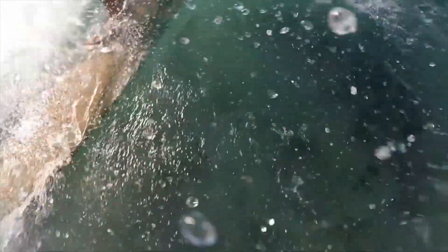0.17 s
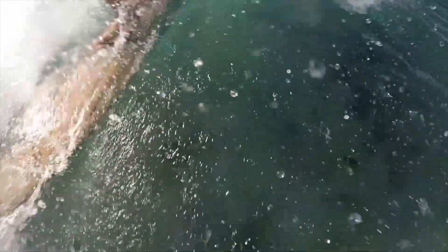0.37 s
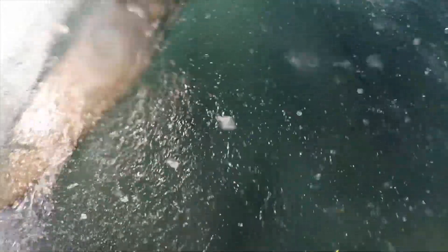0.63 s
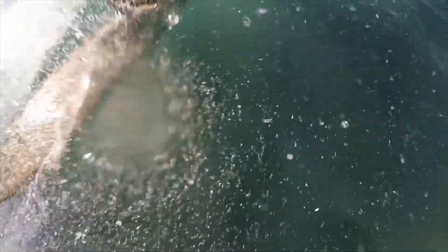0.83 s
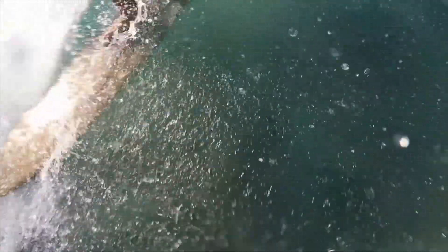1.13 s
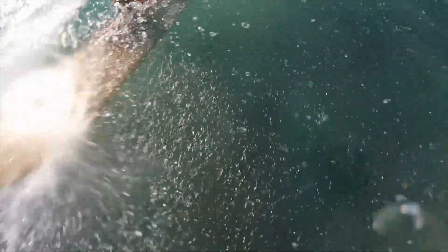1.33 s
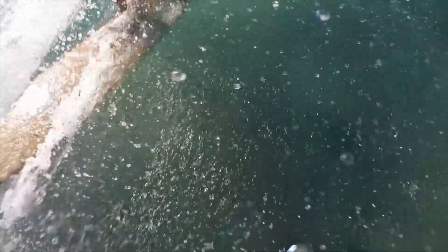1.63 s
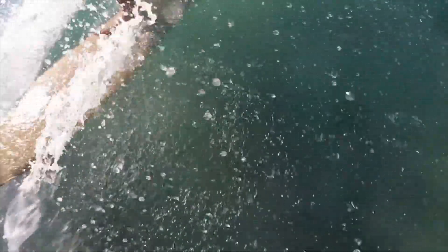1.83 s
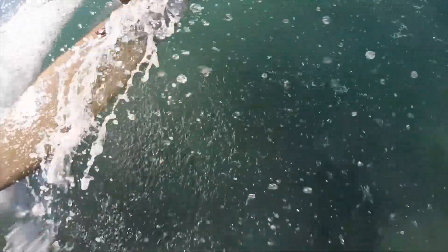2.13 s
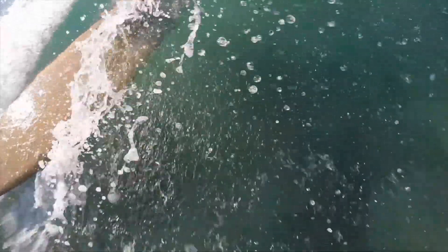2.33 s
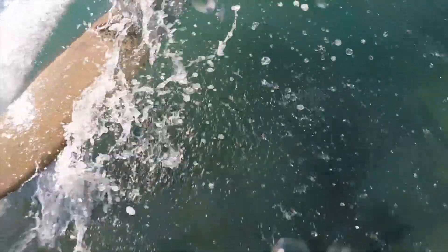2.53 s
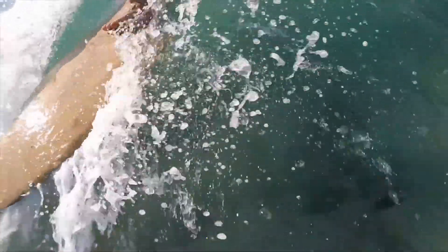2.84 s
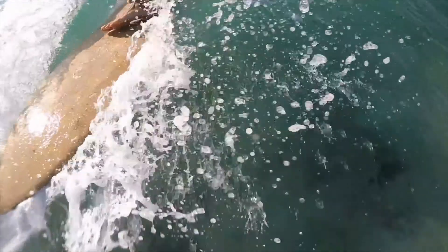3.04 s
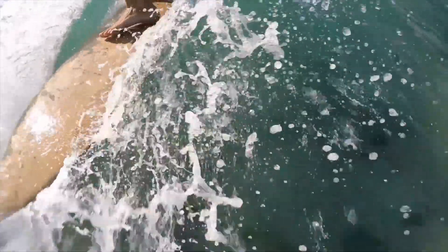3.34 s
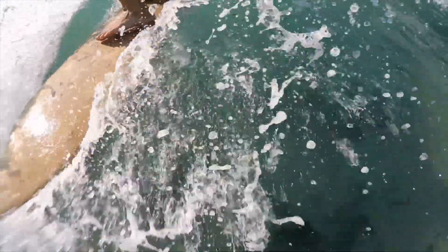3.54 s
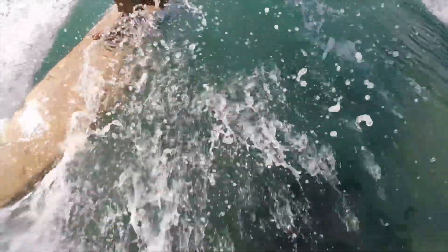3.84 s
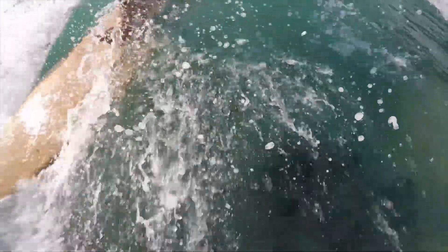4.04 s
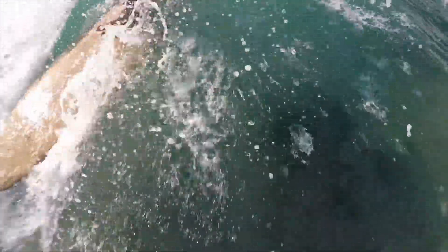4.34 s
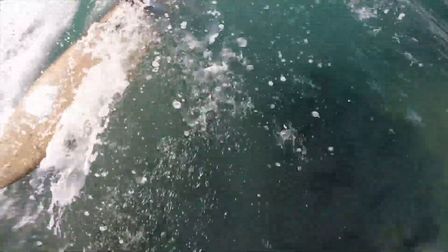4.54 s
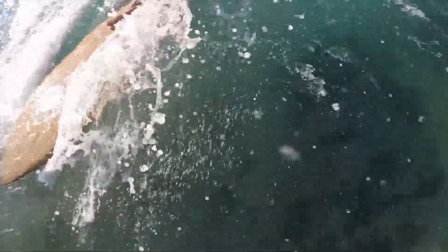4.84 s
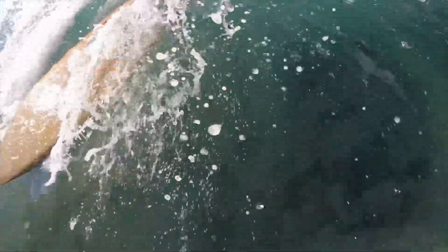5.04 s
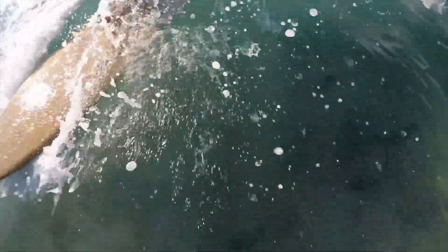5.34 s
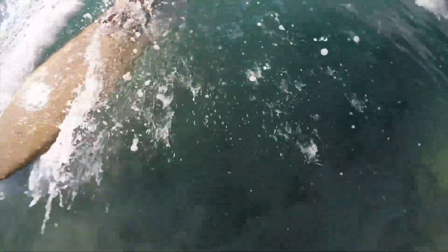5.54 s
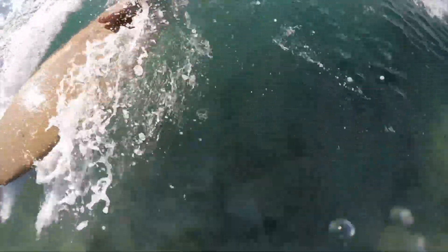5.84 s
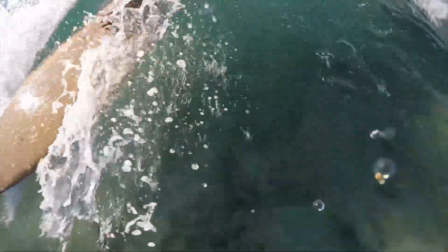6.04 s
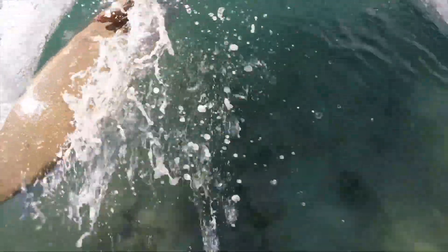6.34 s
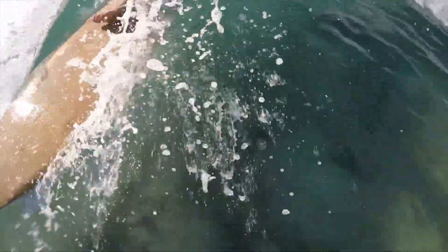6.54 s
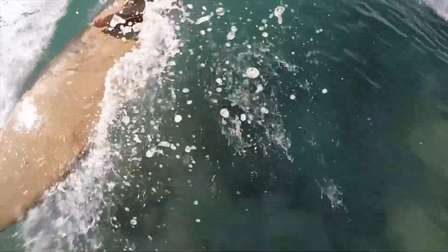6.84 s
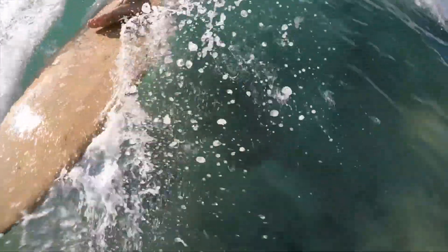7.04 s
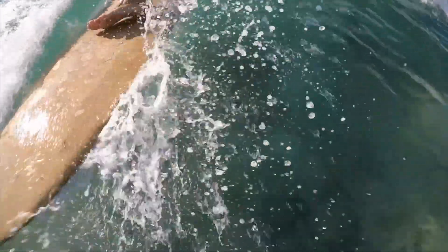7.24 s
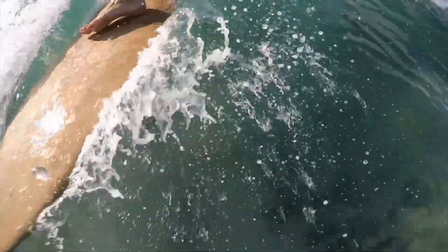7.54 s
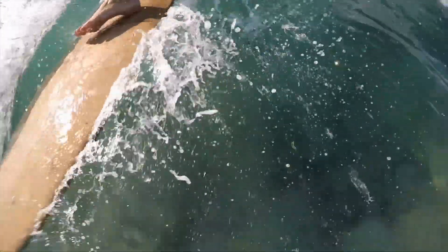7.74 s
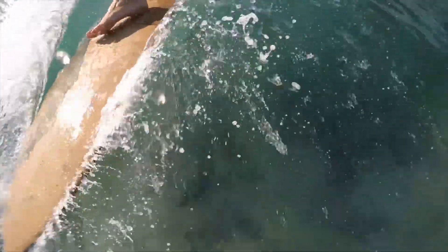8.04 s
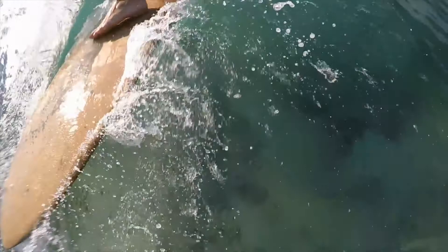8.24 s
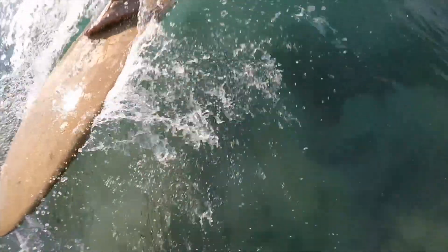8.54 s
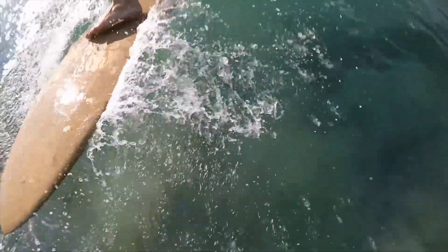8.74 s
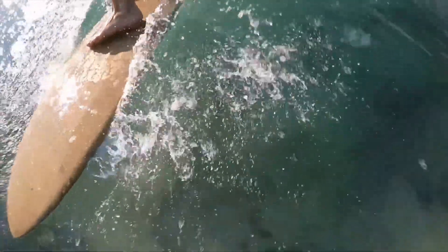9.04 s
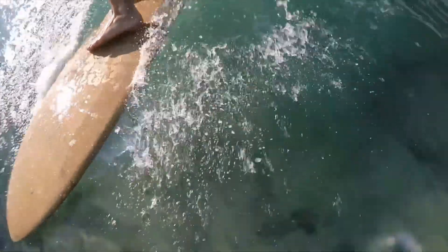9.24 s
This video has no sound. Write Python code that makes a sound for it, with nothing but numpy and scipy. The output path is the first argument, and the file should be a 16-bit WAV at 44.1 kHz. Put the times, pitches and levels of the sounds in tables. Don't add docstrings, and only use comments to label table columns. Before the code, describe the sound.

Outdoors on a wave, close to the board, the microphone is shut in a case that dulls everything. Low rumbling gusts push and thud irregularly. Rushing water, foam and spray start quietly and swell after three seconds. Trapped air glugs against the case, occasional drops tick on it, and a big wobbling surge arrives late, followed by booming wind hits.

```python
import sys
import numpy as np
from scipy import signal
from scipy.fft import rfft, irfft, next_fast_len
from scipy.io import wavfile
from scipy.ndimage import uniform_filter1d

SR = 44100
rng = np.random.default_rng(int(sys.argv[2]) if len(sys.argv) > 2 else 0)


def undo_db(level):
    steps = np.asarray(level, float) / 20
    return 10 ** steps


def inscribe(sig):
    pcm = np.round(np.clip(np.atleast_2d(sig).T, -1, 1) * 32767)
    wavfile.write(sys.argv[1], SR, pcm.astype(np.int16))


N = 414089


def wind(pockets):
    slaps = gust_slaps()
    port_gain, mount_gain, housing_gain = blow_gains()
    # hz, gain_db
    buffet_body = [(2, -12), (5, -1), (15, 0), (30, -2), (45, -5), (60, -8), (82, -17), (140, -34),
                   (400, -90)]
    # hz, gain_db
    shudder_body = [(30, -26), (62, -3), (80, -3), (115, -6), (145, -7), (220, -19.5), (600, -75)]
    # hz, gain_db
    flutter_body = [(60, -24.5), (140, 4.5), (225, 9.5), (250, 6), (285, 0.5), (400, -51.5), (900, -76)]
    buffet = shaken(buffet_body, lumps_hz=12) * port_gain
    shudder = shaken(shudder_body, lumps_hz=18) * mount_gain
    flutter = shaken(flutter_body, lumps_hz=25) * housing_gain
    return slaps + hush(buffet, slaps, knee_db=-15) + hush(shudder + flutter, pockets, knee_db=-26.0)


def gust_slaps():
    # centre_s, peak_db, pitch_hz, length_cycles
    thumps = [(0.129, -12, 29.3, 1.36), (0.479, -16.5, 40.5, 1.4), (1.512, -17, 38.8, 0.67),
              (1.556, -7, 35, 1.1), (3.12, -16, 53, 0.74), (3.168, -5.5, 44.3, 1.23),
              (4.054, -25, 44.2, 0.82), (5.017, -5, 45, 0.71), (5.057, -17, 47, 1.1),
              (5.295, -20, 43.5, 0.91), (5.613, -14, 47.8, 1.7), (5.938, -9.5, 44, 0.93),
              (6.338, -6.5, 40.4, 0.66), (7.011, -22.5, 43.8, 0.35), (7.059, -10, 44.4, 0.5),
              (7.641, -19, 42, 1), (7.671, -14, 60.3, 1.2), (8.266, -14.5, 34.5, 1.6),
              (9.093, -3.5, 46, 1.3), (9.131, -1.5, 48.9, 0.75), (9.267, -9.5, 39.2, 1.07),
              (9.313, -13.4, 44, 0.53)]
    return bursts(thumps, lean=1.0, glide=-.05)


def blow_gains():
    # centre_s, peak_db, length_s
    gusts = [(.11, -22.5, 0.22), (0.557, -16, 0.21), (1.1, -24, 0.091), (1.367, -22, 0.11),
             (1.554, -14, 0.1), (1.84, -19.5, 0.23), (2.868, -20.5, 0.14), (3.21, -14.5, 0.19),
             (3.52, -23, 0.096), (3.74, -18, 0.062), (3.995, -23.5, .25), (4.697, -22.5, 0.2),
             (5.14, -18.5, 0.26), (5.55, -19.5, .22), (6.273, -19, 0.31), (6.61, -16, 0.1),
             (7.082, -15, 0.21), (7.373, -20.5, 0.1), (7.589, -17.5, .12), (7.823, -16.5, 0.083),
             (8.14, -18, 0.12), (8.367, -20.5, 0.098), (8.64, -21, 0.14), (9.08, -13, 0.21),
             (6.819, -22, 0.12), (5.841, -24.5, .1), (2.636, -25, .12), (7.973, -21, .1)]
    # centre_s, peak_db, length_s, mount_over_housing_db
    slabs = [(0.559, -42.5, 0.091, 14), (1.32, -41, 0.11, 8), (1.764, -38, .12, 14),
             (1.893, -34.5, 0.1, 0.5), (2.09, -35, 0.14, 7.5), (2.191, -37, 0.072, -8),
             (2.425, -34, 0.27, 0.5), (3.095, -31.5, 0.39, 1.5), (3.28, -38, .15, 5),
             (4.03, -33.5, 0.34, 4), (4.62, -36, 0.11, -7.5), (4.838, -34.5, .15, 7),
             (4.975, -34, 0.11, -8), (5.39, -29.5, 0.13, 5), (5.56, -32.5, 0.13, -8),
             (5.72, -35.5, 0.17, 8), (5.92, -30, .18, -2), (6.28, -30, 0.35, -1.5),
             (6.476, -30.5, 0.076, 14), (6.604, -32, 0.073, -5), (6.947, -31, 0.21, .1),
             (7.101, -33, 0.22, 10), (7.794, -19.5, .16, 2.2), (8.124, -23.5, 0.11, 0.3),
             (8.367, -34, 0.077, 15), (8.47, -35, 0.14, -8.5), (8.592, -40, 0.091, 0),
             (8.922, -28.5, 0.1, -6.5), (9.077, -29.5, 0.14, 8.5), (9.38, -31.5, 0.16, -5)]
    # centre_s, drop_db, length_s
    lulls = [
        (.88, -3, .2),
        (1.21, -4.5, .12),
        (2.3, -2.5, .3),
        (3.87, -3, .1),
        (4.5, -2.5, .15),
        (6.5, -3, .1),
        (7.7, -6, .1),
        (9.39, -8.5, 0.14),
    ]
    gust_s, gust_db, gust_length = np.transpose(gusts)
    slab_s, slab_db, slab_length, mount_db = np.transpose(slabs)
    blows = [swells(gust_s, undo_db(gust_db) ** 2, gust_length),
             swells(slab_s, undo_db(slab_db + mount_db / 2) ** 2, slab_length),
             swells(slab_s, undo_db(slab_db - mount_db / 2) ** 2, slab_length)]
    calm_db = np.array([[-26], [-35], [-38.5]])
    calm_db_per_speed_db = np.array([[.3], [.3], [.55]])
    speed_db, _ = ride()
    gains = np.sqrt(undo_db(calm_db + calm_db_per_speed_db * speed_db) ** 2 + blows)
    gains[0] *= undo_db(swells(*np.transpose(lulls)))
    return gains


def shaken(body, lumps_hz):
    lumps = undo_db(.6 * walk(lumps_hz))
    return level(colour(rng.standard_normal(N), body) * lumps, -1.5)


def hush(x, under, knee_db):
    power = uniform_filter1d(under ** 2, SR // 30)
    return x / np.sqrt(1 + power / undo_db(knee_db) ** 2)


def gurgle():
    # centre_s, peak_db, pitch_hz, length_cycles
    glugs = [(1.495, -21, 151, 0.84), (2.04, -22, 176, 1.2), (2.134, -20.5, 169, 1.5),
             (2.91, -17.5, 113, 1.5), (3.257, -19, 115, 1.1), (4.61, -13, 158, 0.85),
             (4.744, -20, 185, 0.79), (5.131, -19, 194, 1.2), (5.759, -19, 220, 2.8),
             (6.203, -18.5, 181, 3.5), (6.332, -19.5, 191, 1.4), (6.432, -18.5, 198, 1.2),
             (6.908, -28, 172, 1.5), (7.253, -16.5, 178, 1.1), (7.688, -16.5, 164, 1.2),
             (7.773, -9.5, 216, 2.7), (7.802, -18, 190, 2.4), (7.828, -6.5, 151, 0.31),
             (8.108, -15, 175, 1.3), (8.164, -13.5, 170, 0.67), (8.2, -35, 186, 1.6),
             (8.333, -19, 178, 1.1)]
    # centre_s, peak_db, pitch_hz, length_cycles
    gulps = [
        (3.270, -18, 69, 2.5),
        (7.790, -17.5, 230, 6),
        (7.831, -17.5, 98, 5),
        (8.125, -18, 120, 4),
        (8.310, -21, 115, 3.3),
        (8.401, -19, 88, 4.3),
    ]
    soft = np.array(glugs) * [1, 1, 1, 1.7] - [0, 3, 0, 0]
    return bursts(soft, lean=1.3, glide=0.027) + bursts(gulps, lean=1.2, glide=0.1)


def splashes():
    # centre_s, peak_db, pitch_hz, length_cycles
    drops = [(0.229, -39, 1190, 5.8), (0.766, -39.5, 1240, 3.1), (2.06, -40, 1293, 4.4),
             (3.343, -32, 1470, 2.5), (3.505, -37, 1226, 5.5), (3.681, -35, 1210, 5.3),
             (4.165, -41.5, 1513, 5.3), (4.993, -38, 1210, 7.6), (5.273, -38, 1598, 3),
             (5.702, -27, 1250, 3.4), (6.556, -39, 1457, 4.3), (7.514, -35, 1354, 8.2),
             (7.561, -37, 1310, 7.2), (7.894, -37, 1350, 4.2)]
    # centre_s, peak_db, pitch_hz, length_cycles
    ringing_drops = [
        (5.7035, -38.5, 1950, 6),
        (5.704, -39, 1640, 5),
        (7.512, -45, 1850, 6),
    ]
    return bursts(drops + ringing_drops, lean=1.5, glide=.01)


def water():
    # centre_hz, db_per_speed_db, db_per_rail_db
    water_law = [
        (450, 0.3431, -0.0351),
        (990, -0.0156, 1.29),
        (1850, 0.28, 1.07),
        (2920, 0.95, 0.17),
    ]
    # hz, gain_db
    housing = [(60, -14), (290, -1.5), (640, -1.5), (700, -10), (1090, -11.5), (1200, -19.5), (1340, -16.5),
               (1430, -24.5), (1810, -21), (1950, -32), (2220, -28.5), (2350, -32), (2900, -41.5),
               (3550, -57)]
    controls_db = ride()
    law_hz, *laws = np.transpose(water_law)
    hits = rng.random(N) < .03
    crackle = hits * undo_db(2.2 * rng.exponential(size=N)) * rng.standard_normal(N)
    rush = level(rng.standard_normal(N), 0) + level(crackle, -6.5)
    foam = bubbles(count=2500, low_hz=303.0, octaves=3.1, scatter_db=1.5)
    wash = rush + level(foam, -20)
    surge = walk(12)
    out = 0
    for hz in 60 * 2 ** np.arange(0, 6.5, .5):
        share = [np.interp(np.log(hz), np.log(law_hz), law) for law in laws]
        flicker = walk(20)
        db = share @ controls_db + sheets(hz) + .7 * surge + .35 * flicker
        out = out + undo_db(db) * band(wash, hz)
    return level(colour(out, housing), -33)


def bubbles(count, low_hz, octaves, scatter_db):
    when, pitch, size, cycles = rng.random((count, 4)).T
    time_s = when * N / SR
    peak_db = -scatter_db * np.log(size + 1e-3)
    pitch_hz = low_hz * 2 ** (octaves * pitch)
    return bursts(np.transpose([time_s, peak_db, pitch_hz, 2 + 3 * cycles]), lean=1.3, glide=0.24)


def sheets(hz):
    # centre_s, lift_db, length_s, centre_hz
    breaking = [(.01, 1.5, .12, 399), (0.752, 3, .3, 1805), (2.151, 2.2, 0.54, 450), (3.401, 1, 0.27, 1700),
                (3.802, 2.5, 0.41, 450), (4.298, 3, .15, 450), (5.348, 1.8, 0.62, 450),
                (5.981, 3, .12, 1802), (6.551, 2, .2, 1197), (6.759, 0.5, .1, 900), (7.129, 2.5, .14, 600),
                (7.722, 3, .25, 450), (8.201, 2.5, 0.23, 1900), (9.052, 3.5, 0.28, 418.4)]
    time_s, lift_db, length_s, centre_hz = np.transpose(breaking)
    width_octaves = 1.6
    away = 2 * np.log2(hz / centre_hz) / width_octaves
    return swells(time_s, lift_db * .5 ** (away ** 2), length_s)


def ride():
    # time_s, speed_db, rail_dug_in_db
    path = [(0, -80.5, -48.5), (.7, -81.5, -48), (1.05, -80.5, -48), (1.9, -82, -48.5), (2.6, -80.5, -45),
            (3.2, -76, -44), (3.44, -70.5, -39.5), (3.66, -72, -42.5), (4.55, -73, -45), (5.05, -70, -45),
            (5.75, -69, -45.5), (6, -69.5, -44.5), (6.3, -67.5, -45), (7.15, -67, -43.5),
            (7.85, -66.5, -46), (8.3, -67, -46), (8.95, -65, -43.5), (9.39, -69, -46)]
    time_s, *columns = np.transpose(path)
    both = np.array([np.interp(np.arange(N) / SR, time_s, column) for column in columns])
    return both - both.mean(axis=1, keepdims=True)


def bursts(rows, lean, glide):
    out = np.zeros(N)
    for s, db, hz, cycles in rows:
        half = cycles / hz / 2
        first, last = int((s - 4 * half) * SR), int((s + 4 * half) * SR)
        i = np.arange(max(first, 0), min(last, N))
        t = i / SR - s
        phase = 2 * np.pi * hz * t * (1 + glide * t / half / 2) + lean
        out[i] += undo_db(db) * .5 ** ((t / half) ** 2) * np.cos(phase)
    return out


def swells(s, peak, length):
    t = np.arange(0, N, 64) / SR
    bells = .5 ** ((2 * (t - s[:, None]) / length[:, None]) ** 2)
    return np.interp(np.arange(N) / SR, t, peak @ bells)


def walk(rate):
    k = int(SR / rate)
    held = np.repeat(rng.standard_normal(N // k + 1), k)
    return 1.1 * uniform_filter1d(uniform_filter1d(held, k), k)[:N]


def colour(x, table):
    size = next_fast_len(N)
    hz, db = np.transpose(table)
    log_hz = np.log(np.fft.rfftfreq(size, 1 / SR) + 1)
    log_gain = np.interp(log_hz, np.log(hz), db) * np.log(10) / 20
    cep = irfft(log_gain, size)
    cep[1:size // 2] *= 2
    cep[size // 2 + 1:] = 0
    return irfft(rfft(np.resize(x, size)) * np.exp(rfft(cep)), size)[:N]


def band(x, hz):
    size = next_fast_len(N)
    away = np.clip(2 * np.log2((np.fft.rfftfreq(size, 1 / SR) + 1) / hz), -1, 1)
    return irfft(rfft(x, size) * np.cos(np.pi / 2 * away) ** 2, size)[:N]


def level(x, db):
    return x * undo_db(db) / np.sqrt(np.mean(x ** 2))


def scene():
    pockets = gurgle()
    return (wind(pockets) + pockets + water() + splashes())[None]


def low_pass(x):
    return signal.sosfilt(signal.butter(12, 15000, fs=SR, output="sos"), x)


def record(dry):
    slow_rate_hz, play_rate_hz, sound_top_hz = 12000, 48000, 3560
    lead = SR // 30
    running = np.pad(dry[0], lead, mode="reflect")
    top_cut = signal.ellip(10, .2, 80, sound_top_hz, fs=SR, output="sos")
    stored = signal.sosfilt(top_cut, running)
    samples = signal.resample_poly(stored, slow_rate_hz // 300, SR // 300)
    steps = np.arange(len(samples) * play_rate_hz // slow_rate_hz) * slow_rate_hz / play_rate_hz
    joined = np.interp(steps, np.arange(len(samples)), samples)
    played = signal.resample_poly(joined, SR // 300, play_rate_hz // 300, window=("kaiser", 11.))
    played += undo_db(-101) * rng.standard_normal(len(played))
    start = lead + 12
    return low_pass(played[None, start:start + N])


dry = scene()
out = record(dry)
inscribe(out)
```